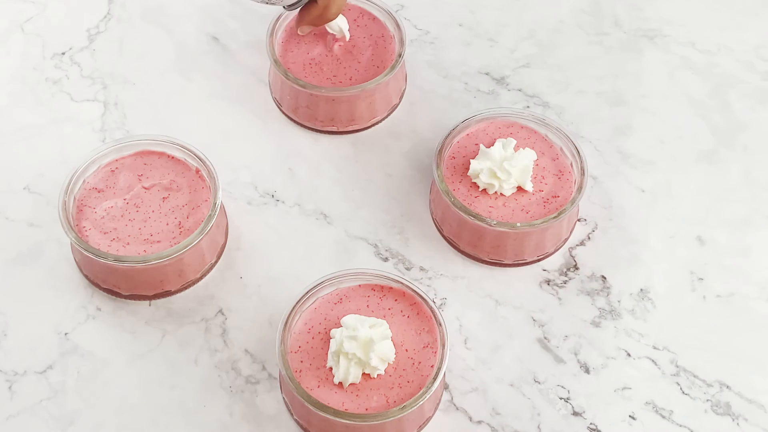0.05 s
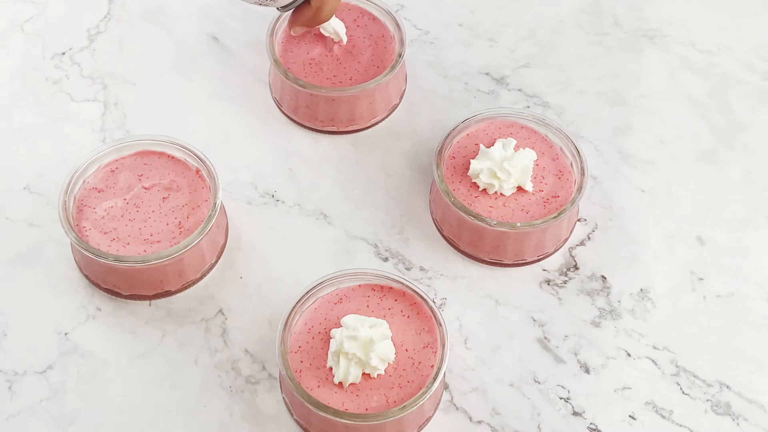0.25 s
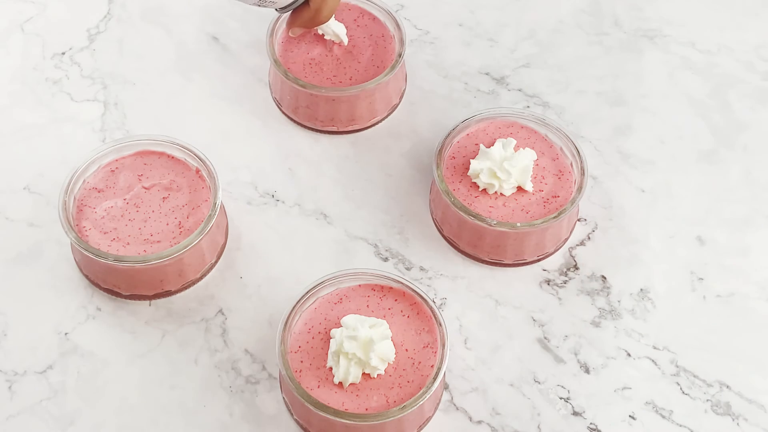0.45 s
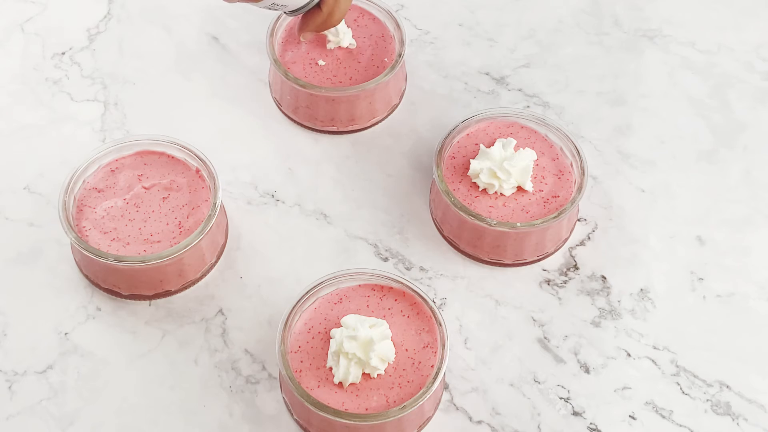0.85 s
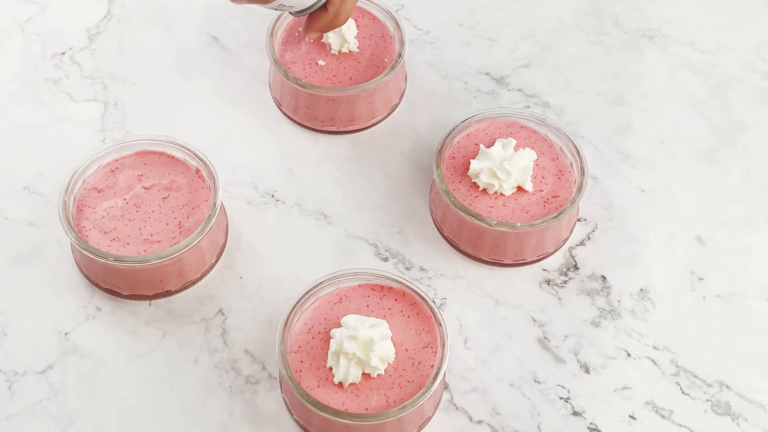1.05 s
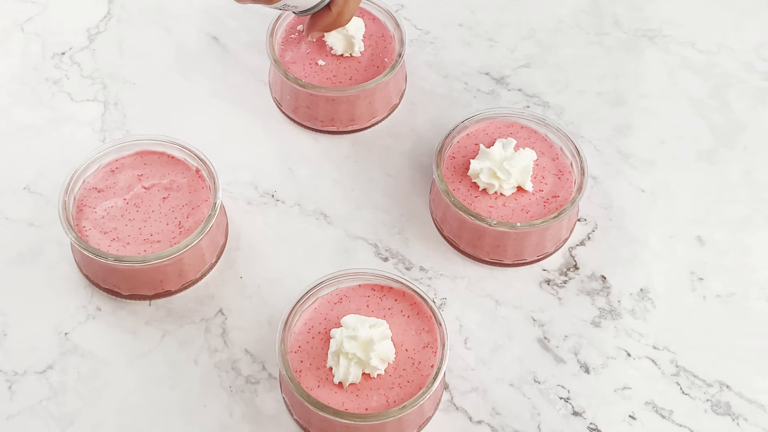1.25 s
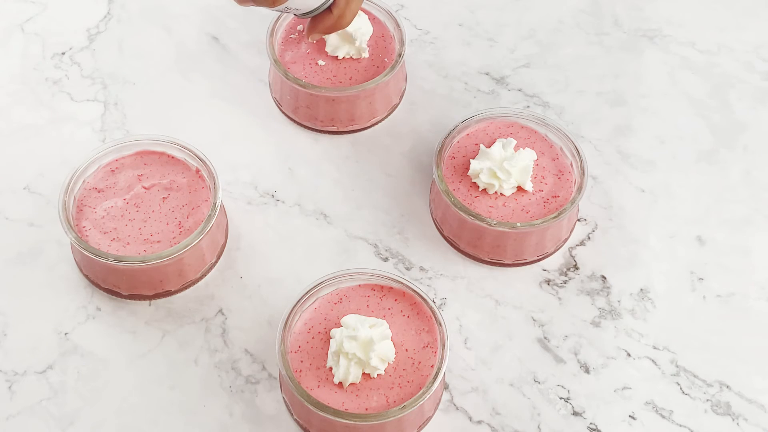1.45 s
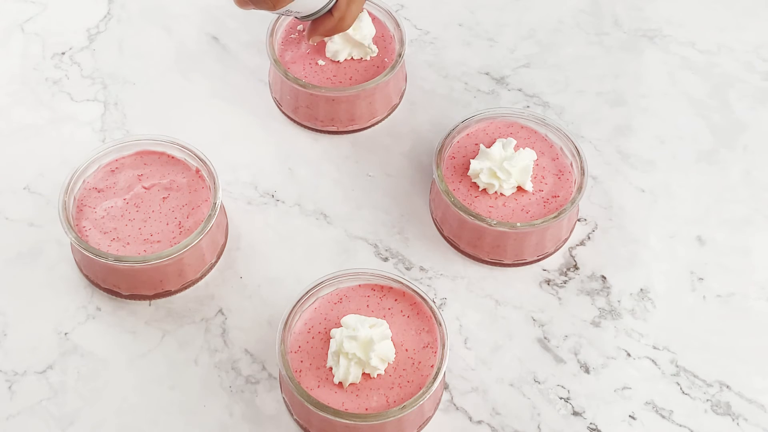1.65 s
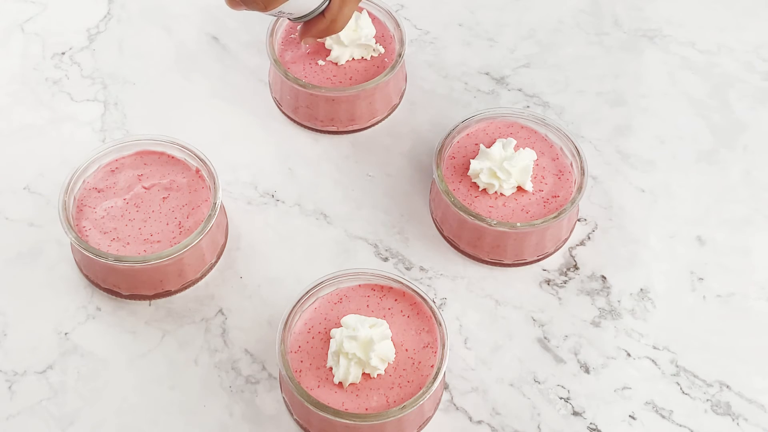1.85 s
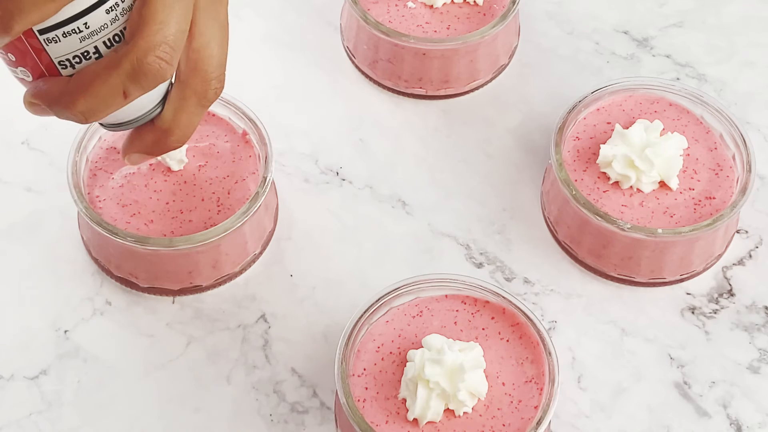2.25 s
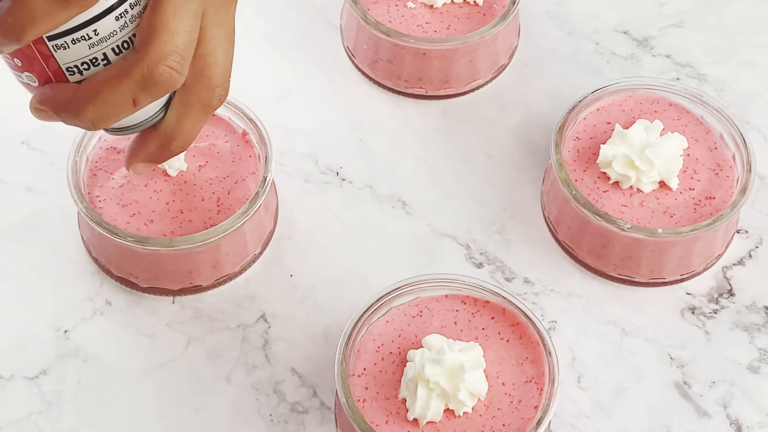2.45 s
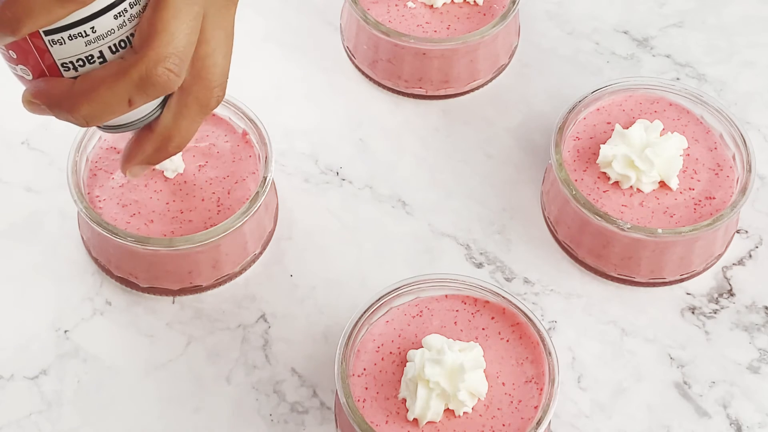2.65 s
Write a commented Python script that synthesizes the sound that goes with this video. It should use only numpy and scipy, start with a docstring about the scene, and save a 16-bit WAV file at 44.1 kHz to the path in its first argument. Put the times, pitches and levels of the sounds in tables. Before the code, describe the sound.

An aerosol can of whipped cream hisses, whistles lightly and sputters out wet foam in one long squirt, then gives a brief, steady jet of gas. The microphone is close, with a faint kitchen hum underneath.

```python
"""A small kitchen: whipped cream is sprayed from an aerosol can onto desserts.
The valve is eased open: gas hisses and whistles first, then foam crackles out of the nozzle, spits,
and dulls as the cream piles up. A second, short squirt on the next dessert is a dry bright jet.
Two close microphone ports hear it all over a faint hum."""
import sys
import numpy as np
from scipy import signal
from scipy.fft import rfft, irfft, next_fast_len
from scipy.io import wavfile
from scipy.ndimage import map_coordinates

SR = 44100
rng = np.random.default_rng(int(sys.argv[2]) if len(sys.argv) > 2 else 0)


def to_wav(s):
    """Save 16-bit WAV."""
    ch = np.atleast_2d(s).T  # columns
    pcm = np.round(np.clip(ch, -1, 1) * 32767)  # PCM
    wavfile.write(sys.argv[1], SR, pcm.astype(np.int16))


N = 119070
TIME = np.arange(N) / SR


def amp(db):
    """Decibels to gain."""
    return 10 ** (np.asarray(db) / 20)


def unit(x):
    """x at rms 1."""
    return x / np.sqrt(np.mean(x ** 2) + 1e-20)


def along(points, hz):
    """(freq_hz, value) points read on a log axis."""
    freq_hz, value = np.transpose(points)
    return np.interp(np.log(hz + 1), np.log(freq_hz + 1), value)


def level(points):
    """Gain per sample from (time_s, level_db) points, silent outside them."""
    time_s, level_db = np.transpose(points)
    return amp(np.interp(TIME, time_s, level_db)) * (TIME > time_s[0]) * (TIME < time_s[-1])


def swells(rows):
    """Gain per sample from bell-shaped (centre_s, half_width_s, level_db) swells."""
    return sum(amp(db) * np.exp(-.5 * ((TIME - s) / width_s) ** 2) for s, width_s, db in rows)


def wobble(rate_hz):
    """Smooth random curve, rate_hz knots a second."""
    return map_coordinates(rng.standard_normal(4096), [TIME * rate_hz], mode="wrap")


def filtered(x, response):
    """x through a complex frequency response."""
    size = next_fast_len(N + SR // 2)
    return irfft(rfft(x, size) * response(np.fft.rfftfreq(size, 1 / SR)), size)[..., :N]


def coloured(x, colour):
    """x through a minimum-phase (freq_hz, gain_db) filter and a 45 Hz low cut, at rms 1."""
    size = 8192
    hz = np.fft.rfftfreq(size, 1 / SR)
    low_cut = ((hz + 1) / np.hypot(hz + 1, 45)) ** 2
    cepstrum = irfft(np.log(amp(along(colour, hz)) * low_cut))
    cepstrum[1:size // 2] *= 2
    cepstrum[size // 2 + 1:] = 0
    impulse = irfft(np.exp(rfft(cepstrum)))
    return unit(signal.fftconvolve(x, impulse)[:N])


def ringing(x, modes):
    """x through narrow (pitch_hz, width_hz, gain_db) resonances."""
    return filtered(x, lambda hz: sum(
        amp(db) * 1j * hz * width / (pitch ** 2 - hz ** 2 + 1j * hz * width)
        for pitch, width, db in modes))


def bubbles(rate_hz, spread_db, rush):
    """Tiny bubbles bursting at random over a smooth rush."""
    size = amp(spread_db * np.clip(rng.standard_normal(N), -2, 2))
    clicks = (rng.random(N) < rate_hz / SR) * size * rng.choice([-1, 1], N)
    return unit(clicks) + rush * rng.standard_normal(N)


def pops(rows, rise_cycles):
    """Each pocket or blob bursts with a few fast-dying cycles."""
    track = np.zeros(N + SR)
    t = np.arange(SR // 8) / SR
    for start_s, peak_db, pitch_hz in rows:
        age = t * pitch_hz / rise_cycles
        envelope = amp(peak_db) * (age * np.exp(1 - age)) ** 2
        track[round(start_s * SR):][:len(t)] += envelope * np.sin(2 * np.pi * pitch_hz * t)
    return track[:N]


def nozzle(x):
    """x plus the nozzle's resonances, at rms 1."""
    # nozzle resonances: pitch_hz, width_hz, gain_db
    modes = [(2404, 27, 3), (3310, 57, 0.5), (3910, 90, -25), (4773, 81, 1), (5160, 93, -9), (5550, 54, 3),
             (6000, 93, -4)]
    return unit(x + ringing(x, modes))


def background():
    """Room noise, mains hum, and a low rumble while the cream flows and the can is moved."""
    # room noise spectrum: freq_hz, gain_db
    floor_colour = [(20, -40), (40, -30), (65, 5.5), (100, -10), (190, -11.5), (400, -9.5), (650, -23),
                    (1500, -21), (5000, -35.5), (15000, -40)]
    # rumble envelope: time_s, level_db
    rumble_envelope = [(0, -70), (.16, -61.5), (.55, -63), (.7, -59), (1.2, -60), (1.9, -58), (2.04, -55),
                       (2.09, -80)]
    # rumble spectrum: freq_hz, gain_db
    rumble_colour = [(20, -33), (45, -14), (65, 2), (125, 9.5), (200, 7), (500, -5.5), (3000, -48)]
    floor_db, hum_db, hum_hz = -57.5, -62.5, 119.6
    hum = amp(hum_db) * np.sqrt(2) * np.sin(2 * np.pi * hum_hz * TIME + .22 * wobble(5.8))
    rumble = level(rumble_envelope) * coloured(rng.standard_normal(N), rumble_colour)
    floor = amp(floor_db) * coloured(rng.standard_normal(N), floor_colour)
    return floor + hum + rumble


def kitchen(x):
    """Early echoes off counter and glasses, then a short tail."""
    # tail decay time: freq_hz, t60_s
    tail_t60 = [(150, 0.25), (1000, 0.38), (2300, 0.36), (4500, 0.65), (9000, 0.25), (15000, 0.37)]
    # tail against direct sound: freq_hz, level_db
    tail_level = [(150, -9.5), (1000, -9.5), (2300, -5.5), (4000, -19.5), (9000, -6), (15000, -19.5)]
    early_count, early_db, early_span_s = 14, -9, .012
    hz, t, noise = signal.stft(rng.standard_normal(SR // 2), SR, nperseg=256)
    decay = amp(-60 * t / along(tail_t60, hz)[:, None])
    energy = np.mean(decay ** 2, axis=1, keepdims=True) * SR / 2
    decay *= amp(along(tail_level, hz))[:, None] / np.sqrt(energy)
    tail = signal.istft(noise * decay, SR, nperseg=256)[1]
    impulse = np.pad(tail, (SR // 200, 0))  # 5 ms pre-delay
    lag, polarity = rng.random(size=(early_count, 2)).T
    taps = ((lag + .1) * early_span_s * SR).astype(int)
    impulse[taps] += amp(early_db) * np.sign(polarity - .5) / np.sqrt(early_count)
    return signal.fftconvolve(x, impulse)[:N]


def ports(x):
    """Sound reaches the left microphone port first; shifting scatter makes the two differ in the treble."""
    # left port's phase lead: freq_hz, lead_rad
    lead = [(30, 0), (900, -.2), (2000, 0), (2550, .5), (3300, 0), (3900, .1), (4450, .55), (5000, .1),
            (5700, .9), (6400, 2.3), (7300, 3.14), (8500, 4.1), (9800, 6.1), (10900, 6.4), (12200, 8.2),
            (13500, 9.4), (14800, 10.3), (16000, 12.4)]
    # likeness of the ports: freq_hz, coherence
    likeness = [(100, .99), (500, .97), (2000, .98), (3600, .99), (4500, .94), (6000, .82), (7000, .995),
                (7700, .995), (9000, .8), (10300, .97), (12000, .84), (13200, .99), (13900, .99),
                (15200, .68)]

    def mid_side_gains(hz):
        angle = np.arccos(np.clip(along(likeness, hz), 0, 1)) / 2
        return np.array([np.cos(angle), np.sin(angle)])

    scatter = rng.standard_normal(300)
    scattered = signal.fftconvolve(x, scatter / np.linalg.norm(scatter))[:N] * unit(wobble(150))
    mid, side = filtered(np.array([x, scattered]), mid_side_gains)
    pair = np.array([mid + side, mid - side])
    return filtered(pair, lambda hz: np.exp(.5j * np.outer([1, -1], along(lead, hz))))


def tipping():
    """A faint hollow ring as the can is tipped."""
    # hollow resonances: pitch_hz, width_hz, gain_db
    modes = [(672, 71, 4), (1095, 64, -5.5)]
    # ring envelope: time_s, level_db
    envelope = [(0, -56.5), (.11, -51), (.2, -54)]
    return level(envelope) * unit(ringing(rng.standard_normal(N), modes))


def fizz():
    """The nozzle fizzes on briefly after the first squirt."""
    # fizz envelope: time_s, level_db
    envelope = [(1.9, -29), (1.98, -46), (2.06, -50), (2.075, -68)]
    # fizz spectrum: freq_hz, gain_db
    colour = [(300, -12), (1200, -8), (1800, -8.5), (2400, 2.5), (3000, -5), (5000, -16), (15000, -50)]
    return level(envelope) * coloured(bubbles(rate_hz=5300, spread_db=4, rush=.6), colour)


def plops():
    """Blobs of cream plop, soft and low."""
    # blobs: start_s, peak_db, pitch_hz
    blobs = [(1.321, -25, 300), (1.324, -23, 560), (1.582, -29.5, 234), (1.62, -32, 250)]
    return pops(blobs, rise_cycles=1.3)


def squeak():
    """Gas squeezing past the cream sets the nozzle whistling in fits and starts."""
    # whistle envelope: time_s, level_db
    envelope = [(.04, -73), (.17, -58), (.22, -45), (.36, -37), (.46, -44.5), (.62, -39), (.95, -39),
                (1.1, -42), (1.45, -41), (1.68, -29), (1.8, -44), (1.91, -31.5), (1.94, -56)]
    # whistle resonances: pitch_hz, width_hz, gain_db
    modes = [(3355, 43, 5), (2393, 28, -1.5)]
    whistle = unit(ringing(rng.standard_normal(N), modes))
    return level(envelope) * unit(amp(3 * wobble(90)) * whistle)


def surges():
    """Short bright sizzles where gas breaks through the cream."""
    # gas breakthroughs: centre_s, half_width_s, level_db
    breakthroughs = [(.162, 0.0045, -36), (.213, 0.014, -35.5), (.727, 0.012, -23), (.84, 0.056, -32),
                     (.95, 0.017, -31), (1.06, 0.0036, -26.5), (1.135, 0.0088, -34), (1.2, 0.022, -34),
                     (1.325, 0.011, -28.5), (1.365, 0.027, -32), (1.432, 0.004, -24), (1.688, .035, -29.5),
                     (1.884, 0.0082, -27)]
    # sizzle spectrum: freq_hz, gain_db
    colour = [(200, -9), (1500, -3), (2500, -14.5), (4500, -21.5), (6000, -47.5), (8500, 1), (10500, -1),
              (12800, 5), (15600, -5.5)]
    sizzle = amp(.89 * wobble(290)) * bubbles(rate_hz=2300, spread_db=12, rush=1)
    return swells(breakthroughs) * coloured(sizzle, colour)


def spurts():
    """Wet gobs of cream and gas splutter out in quick swells."""
    # gobs: centre_s, half_width_s, level_db
    gobs = [(.708, .012, -25), (.842, .011, -27), (1.046, .008, -26), (1.131, .006, -26), (1.19, .005, -26),
            (1.367, .007, -24), (1.584, .004, -29), (1.627, .007, -27), (1.88, .012, -29)]
    # splutter spectrum: freq_hz, gain_db
    colour = [(300, -21.5), (1500, -5), (2400, 4), (3300, -0.5), (4600, -5), (6000, -11.5), (15600, -21)]
    splutter = coloured(bubbles(rate_hz=1600, spread_db=.5, rush=.79), colour)
    return swells(gobs) * nozzle(splutter)


def spits():
    """Large gas pockets burst at the nozzle."""
    # gas pockets: start_s, peak_db, pitch_hz
    pockets = [(.1585, -24, 3330), (.635, -12, 3260), (.9015, -15, 4050), (.9342, -8, 3500),
               (.9436, -7, 3740), (.946, -10, 3500), (.954, -14, 4220), (.9728, -11, 4100),
               (1.0345, -15, 3300), (1.0594, -14, 4050), (1.1335, -16, 4600), (1.136, -15, 2300),
               (1.1852, -11, 4160), (1.1888, -10, 4100), (1.3608, -12.5, 2800), (1.389, -14, 2630),
               (1.4465, -16, 2450), (1.5083, -12.5, 3490), (1.6215, -15, 3000), (1.6755, -14, 3360),
               (1.7228, -12.5, 3360), (1.7243, -11.5, 3360), (1.787, -15, 2700), (1.8144, -10.5, 2900),
               (2.192, -19, 2930)]
    return pops(pockets, rise_cycles=2)


def gas():
    """Propellant hisses through the wet nozzle, fluttering and half whistling."""
    # gas flow, first squirt: time_s, level_db
    envelope = [(.02, -57), (.07, -45), (.17, -43), (.23, -28.5), (.37, -27), (.44, -29), (.6, -24.5),
                (.73, -24), (.95, -32.5), (1.02, -52), (1.2, -32.5), (1.5, -37), (1.91, -53), (1.94, -58)]
    # hiss spectrum: freq_hz, gain_db
    colour = [(100, -14), (380, -19), (580, -15), (870, -18), (1040, -12), (1310, -12), (1470, -17),
              (1660, -11), (2000, -7), (2220, -8), (2400, -3), (2700, -4), (2950, -8), (3450, -1),
              (3900, -5), (4400, -2), (4950, -10), (5900, -11), (6500, -9), (7580, -14), (8520, -8),
              (9580, -15), (10160, -16), (12840, -9), (15600, -15)]
    flutter = amp(.7 * wobble(25) + 1.2 * wobble(220))
    hiss = coloured(flutter * bubbles(rate_hz=2500, spread_db=4, rush=.91), colour)
    return level(envelope) * nozzle(hiss)


def jet():
    """Second squirt: the valve snaps open on nearly dry gas, steady and bright, and shuts quickly."""
    # jet spectrum: freq_hz, gain_db
    colour = [(300, -28), (450, -26), (520, -30), (820, -30), (1080, -25), (1300, -29), (1560, -25),
              (1710, -15), (1870, -16), (2150, -4.5), (2460, -8), (2960, -1), (3240, -6), (3390, -4.5),
              (4270, -6), (4470, -4), (5120, -4), (5610, -12), (6440, 0), (8100, -9), (8470, -3),
              (9290, -12), (10650, -9), (12790, -14), (13390, -8), (15600, -3)]
    on_s, off_s, attack_s, release_s = 2.069, 2.433, .021, .002
    jet_db, sag_db, sag_s = -20.3, 4.5, .035  # sags as the finger lets go
    snap_db, snap_decay_s = -41, .005
    opening = np.clip((TIME - on_s) / attack_s, 0, 1)
    closing = np.exp(-np.maximum(TIME - off_s, 0) / release_s)
    flow_db = jet_db - sag_db * np.exp(np.minimum(TIME - off_s, 0) / sag_s)
    snap = amp(snap_db) * (TIME > on_s) * np.exp(-np.abs(TIME - on_s) / snap_decay_s)
    hiss = amp(.8 * wobble(230)) * bubbles(rate_hz=3000, spread_db=3, rush=1.6)
    return (snap + opening * closing * amp(flow_db)) * coloured(hiss, colour)


def foam():
    """Cream tears out in clumps of bursting bubbles, rings can and glass, and dulls as it piles up."""
    # foam flow, first squirt: time_s, level_db
    envelope = [(.05, -52), (.28, -37.5), (.44, -67), (.5, -36.5), (.62, -27), (.73, -26), (.9, -23.5),
                (1.0, -25), (1.06, -23.5), (1.35, -23), (1.5, -22.5), (1.78, -23.5), (1.91, -21),
                (1.945, -48.5), (2.05, -66)]
    # crackle spectrum: freq_hz, gain_db
    colour = [(60, -20), (110, -16), (170, -16), (260, -9), (320, -10), (560, -2.5), (760, -3), (920, -6),
              (1020, -3), (1320, -3.5), (1460, -10), (1540, -5.5), (2070, -2.5), (2210, -4), (2400, -2),
              (2850, -1), (3050, -4), (3280, -1.5), (3650, -5), (4350, -2), (4900, -8), (5900, -12),
              (6400, -7), (7520, -11), (8020, -9), (10370, -15), (12590, -9), (15600, -16)]
    # can and glass resonances: pitch_hz, width_hz, gain_db
    modes = [(1035, 30, -9), (1797, 20, -1), (2024, 9, 2), (2157, 8, -4), (2545, 12, -8), (2651, 12, -7),
             (588, 59, -13), (433, 27, -4), (3741, 20, -7)]
    buried_s, dull_hz, dull_swing_db = 1, 4370, -4.5  # one band falls as cream buries the nozzle
    clumps = amp(.8 * wobble(70) + 1.7 * wobble(280))
    crackle = nozzle(coloured(clumps * bubbles(rate_hz=3000, spread_db=3.5, rush=.56), colour))
    band = filtered(crackle, lambda hz: np.exp(-(np.log((hz + 1) / dull_hz) / .47) ** 2))
    band_db = dull_swing_db * np.tanh((TIME - buried_s) / .19) / 2
    outflow = level(envelope) * (crackle + (amp(band_db) - 1) * band)
    return outflow + ringing(outflow, modes)


def scene():
    """Two squirts in the kitchen, in stereo."""
    can = tipping() + gas() + squeak() + foam() + spurts() + surges() + fizz() + jet() + spits() + plops()
    return ports(can + kitchen(can) + background())


def record(dry):
    """Steep low-pass at the band limit."""
    top_hz, edge_hz = 15760, 70
    return filtered(dry, lambda hz: (1 - np.tanh((hz - top_hz) / edge_hz)) / 2)


dry = scene()
out = record(dry)
to_wav(out)
```